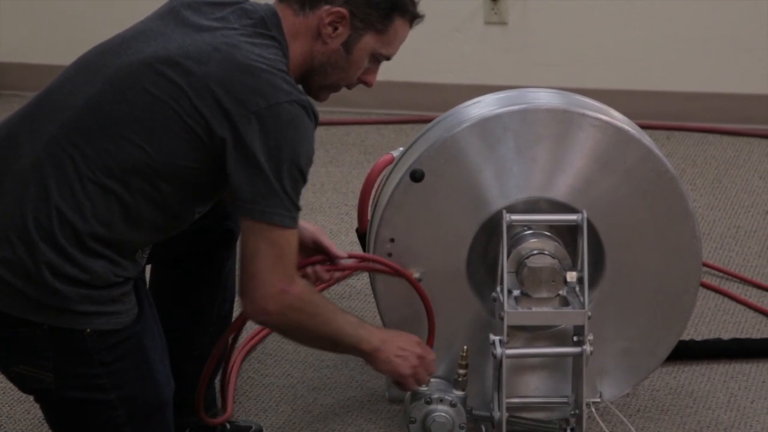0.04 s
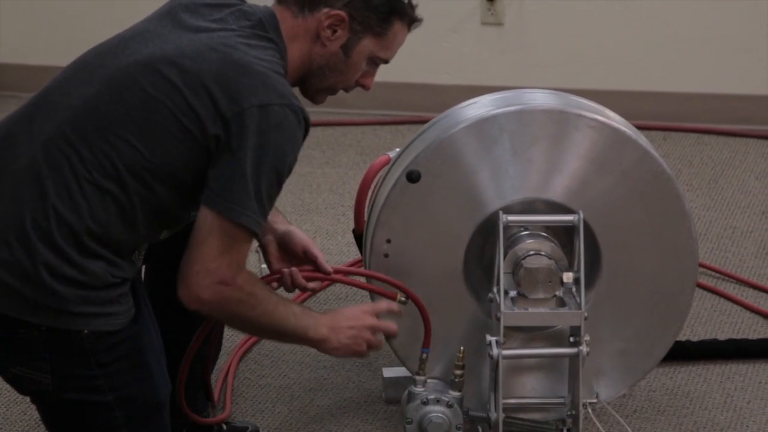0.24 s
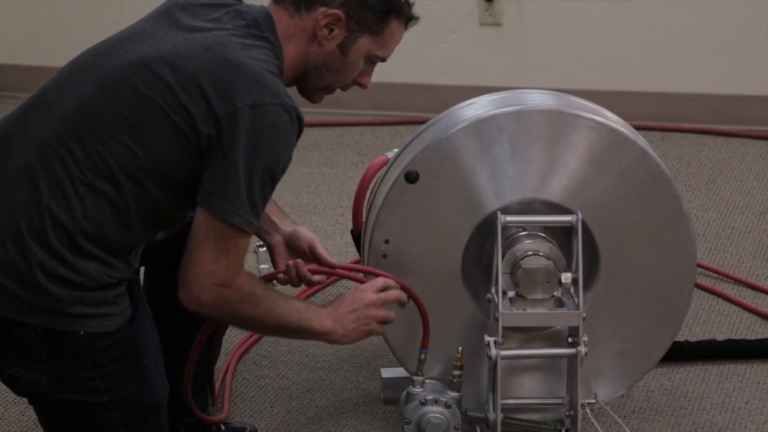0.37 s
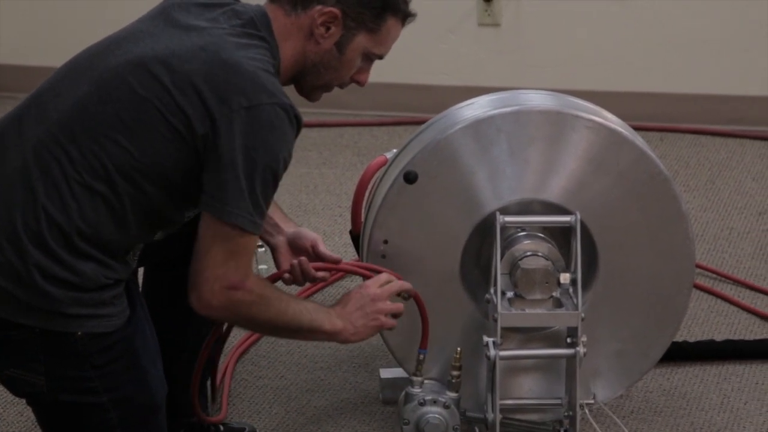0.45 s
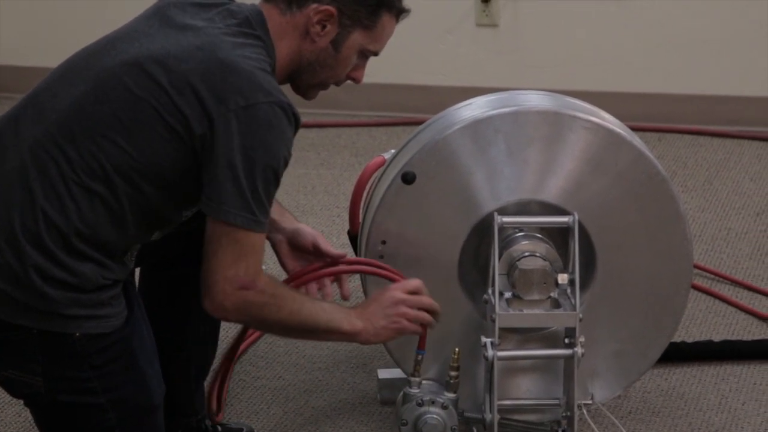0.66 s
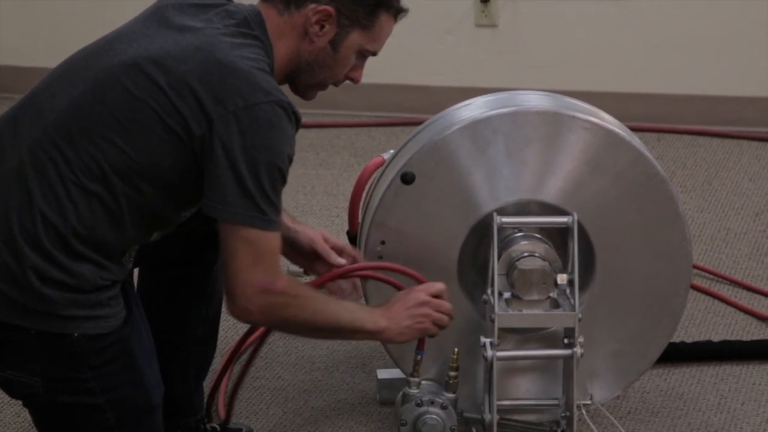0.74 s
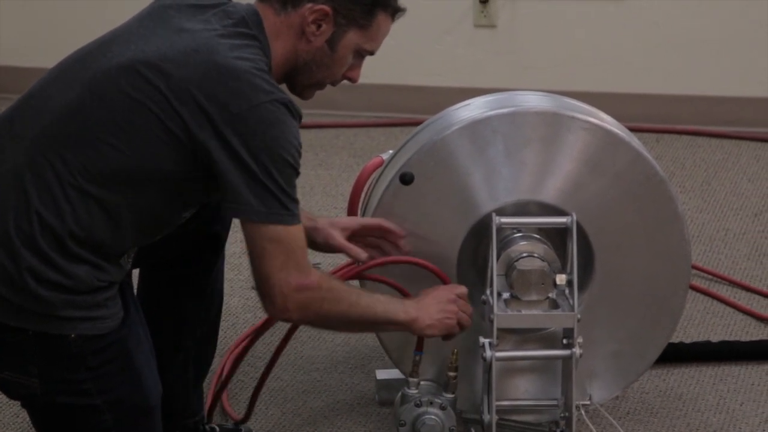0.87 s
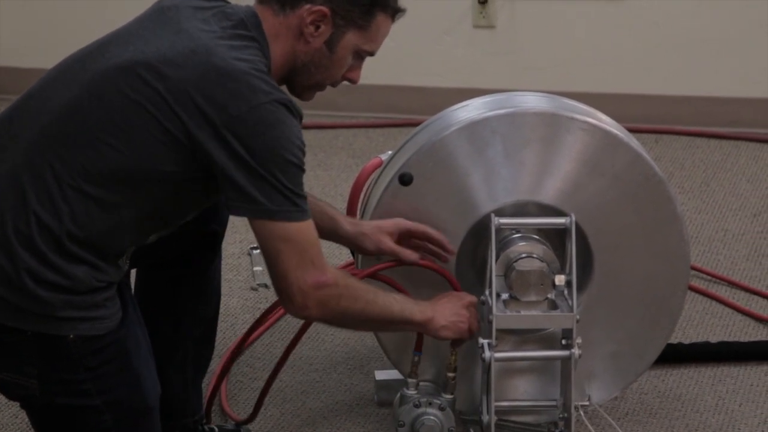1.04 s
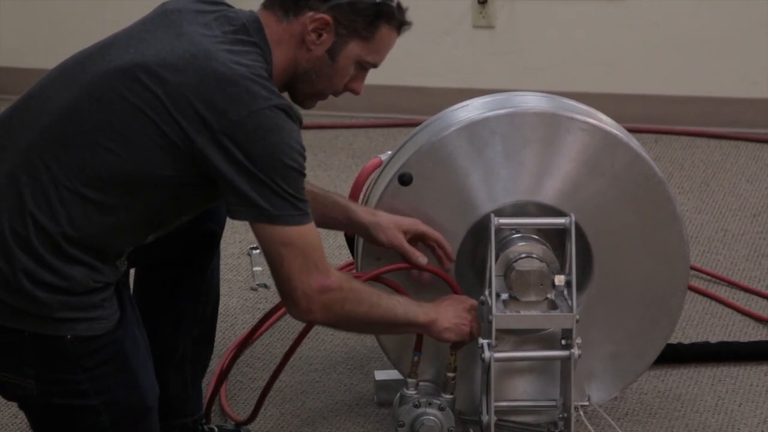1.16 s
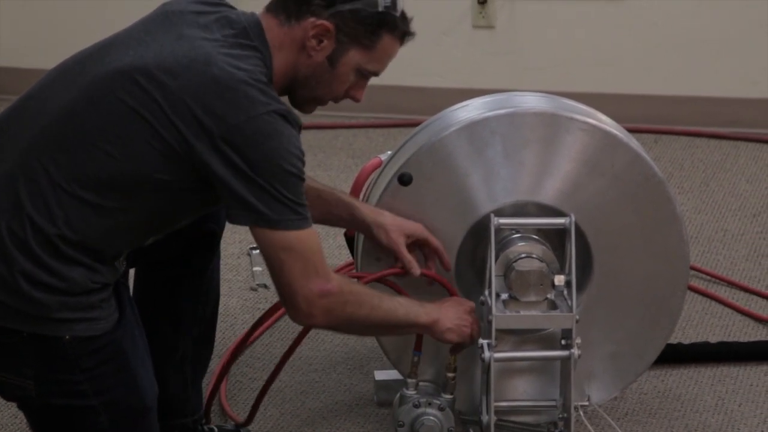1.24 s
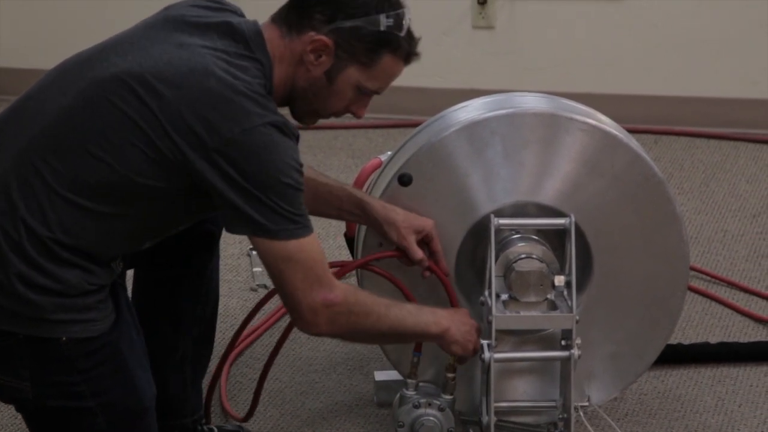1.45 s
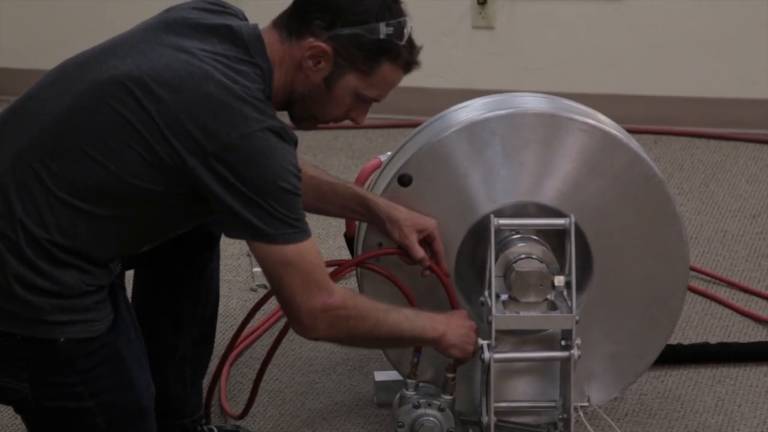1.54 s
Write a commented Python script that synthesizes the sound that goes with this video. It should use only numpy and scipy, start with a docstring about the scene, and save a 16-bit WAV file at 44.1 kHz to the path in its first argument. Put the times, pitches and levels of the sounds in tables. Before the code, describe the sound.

A metal quick-connect air fitting pops loose with a sharp hollow snap and faint hiss, then dry ticks, rubber hose sliding, and a second fitting clinking into its socket, close up in a quiet carpeted room.

```python
"""Ventilation rumbles (shaped noise) while a hose slides through the hand (noise on a level curve).
A quick-connect coupler on a pneumatic motor pops off: noise bursts, a ringing housing, bleeding air.
The hose and loose fittings tick; a second fitting rubs, knocks and clinks at its socket (decaying modes).
A metal drum hums, the hose bumps the floor and a seal squeaks at the end, in a carpeted workshop."""
import sys
import numpy as np
from scipy import signal
from scipy.fft import rfft, irfft
from scipy.io import wavfile
from scipy.ndimage import uniform_filter1d

SR = 44100
rng = np.random.default_rng(int(sys.argv[2]) if len(sys.argv) > 2 else 0)


def dump_mix(stems):
    """Bounce the given channels to the path in sys.argv[1] as a 16-bit WAV at rate SR."""
    frames = np.atleast_2d(stems).T  # one column per channel
    limited = np.clip(frames, -1, 1)  # hard clip at full scale
    pcm = np.round(limited * 32767).astype(np.int16)
    wavfile.write(sys.argv[1], SR, pcm)


N = 70560
T = np.arange(N) / SR
HZ = np.maximum(np.arange(N + 1) * SR / (2 * N), 1)

# Noise spectra give shape only: each noise is scaled to rms 1 before its level is applied.
# ventilation and hiss: [f/Hz, density/dB per Hz]
AIR_SPECTRUM = [(15, -31), (25, -9.5), (48, -35.5), (68, -8), (92, -3), (120, -5.5), (217, -16), (242, -18),
                (277, -19.5), (531, -28.5), (575, -28), (863, -33.5), (962, -33), (2990, -51),
                (3720, -46.5), (6740, -49.5), (16000, -47.5)]
AIR_DB = -44
# hiss of opposite sign left and right: [f/Hz, density/dB per Hz]
HISS_SPECTRUM = [(20, -29), (250, -2), (700, 3), (2000, 3), (15000, -9)]
HISS_DB = -69.5

# hose sliding through the hand: [t/s, level/dB], [f/Hz, density/dB per Hz]
SLIDE_LEVEL = [(0, -59), (.6, -66), (.78, -62.5), (.9, -53), (1.0, -52.5), (1.1, -54.5), (1.22, -55.5),
               (1.4, -59), (1.6, -60.5)]
SLIDE_SPECTRUM = [(500, 5.5), (1500, -3.5), (3200, -3.5), (5000, -2), (10000, -4.5), (13000, -10),
                  (16000, -39)]
# hose brushing clothing: [t/s, level/dB], [f/Hz, density/dB per Hz]
BRUSH_LEVEL = [(0, -63.5), (.9, -73.5), (1.05, -64), (1.13, -53.5), (1.2, -60.5), (1.3, -52), (1.6, -75)]
BRUSH_SPECTRUM = [(300, -9), (570, 2), (850, 0), (1500, -7), (2150, 3), (3000, -13), (8000, -43)]

# sleeve slides back, plug pops free: [t/s, level/dB]
SNAPS = [(.0514, -44), (.0543, -14.5), (.0572, -13)]
# main hollow modes of motor housing and coupler: [f/Hz, level/dB, t60/s]
HOUSING_MODES = [(535, -5, .045), (622, 0, .055)]
# their short overtones, before OVERTONE_DB: [f/Hz, level/dB]
OVERTONES = [(950, -1), (1190, -3), (1275, -5), (1385, -1), (1475, -5), (1600, -5), (1780, -8), (1965, -5),
             (2520, -11), (2920, -3), (3340, -1), (3620, -6), (4720, -7), (5250, -5)]
OVERTONE_DB, OVERTONE_1KHZ_T60_S, OVERTONE_T60_EXPONENT = -5, .024, .25
HOUSING_HIGHPASS_HZ = 450
# burst of air at the pop: [f/Hz, density/dB per Hz]
CRACK_SPECTRUM = [(200, -38), (350, -21.5), (490, 0), (720, -2.5), (850, -3.5), (1300, 1.5), (2300, -6),
                  (3400, -4), (5200, -13.5), (6500, -23), (10000, -16), (15000, -38)]
CRACK_DB, CRACK_T60_S = -.5, .021  # level relative to each snap
# trapped air hissing out: [f/Hz, density/dB per Hz]
BLEED_SPECTRUM = [(1200, -18), (2400, -5.5), (3400, -1.5), (4300, -9.5), (7000, -27.5)]
BLEED_DB, BLEED_T60_S = -48, 1

# dry ticks of hose and loose fittings: [t/s, level/dB before TICK_GAIN_DB, tilt/dB per octave]
TICKS = [(0.067, -31, 15), (0.0769, -18, 5), (0.231, -45, -5), (0.2513, -29.5, 0), (0.2548, -34, 1),
         (.261, -45, -7), (0.2858, -34, 0), (0.4414, -46.5, 0), (0.4841, -40.5, -4.5), (.606, -45, 0),
         (0.621, -40.5, 1), (.6428, -33, 6), (0.6443, -32.5, 2), (0.6473, -35, -2), (0.649, -23, -0.5),
         (0.6498, -25.5, 4.5), (.6524, -48, 11), (0.6639, -31.5, -2.5), (.6728, -26, 0), (0.748, -36, -0.5),
         (1.2574, -30, -4), (1.533, -34, 5.5)]
# filter gain of every tick: [f/Hz, gain/dB]
TICK_GAIN = [(400, -2), (1200, -5), (2200, -1), (3800, -3), (5300, 2), (9500, 0), (12500, -7.5),
             (15500, -17)]
TICK_GAIN_DB, TICK_HIGHPASS_HZ = 8, 700
RATTLE_DB, RATTLE_T60_S = -15, .016  # level relative to the spike
TILT_PIVOT_HZ, TILT_FLOOR_HZ = 8000, 2000

# plug rubbing in the socket: [t/s, level/dB]
RUB_LEVEL = [(.9, -90), (1.05, -65), (1.14, -58), (1.22, -56), (1.27, -44.5), (1.34, -46.5), (1.42, -52),
             (1.47, -62), (1.6, -60)]
RUB_SLEEVE_DB, RUBS_PER_S = -15, 3300  # sleeve relative to body; mean slip rate
# body behind the socket: [f/Hz, level/dB, t60/s]
BODY_MODES = [(1030, -14, .04), (1123, -3, .08), (1262, -3, .06), (1340, -6, .05), (1416, -1, .07),
              (1510, -4, .05), (1604, -9, .09), (1775, -7, .07), (1850, -14, .09)]
# steel sleeve: [f/Hz, level/dB, t60/s]
SLEEVE_MODES = [(4130, -15, .03), (4365, -4, .06), (4410, -3, .05), (4640, -9, .07), (4719, -2, .08),
                (4935, -3, .05), (5148, -3, .06), (7860, -14, .06), (8050, -11, .1), (8680, -19, .06)]
# hollow knocks of plug on socket: [t/s, f/Hz, level/dB]
KNOCKS = [(1.131, 590, -41), (1.1868, 1436, -25.5), (1.532, 1280, -36), (1.5356, 1230, -33.5)]
KNOCK_RISE_S = .0012
# second fitting meets its socket: [t/s, body level/dB, sleeve level/dB, grinding level/dB]
CLINKS = [(1.1808, -55, -59, -33.5), (1.1841, -61, -42, -36.5), (1.2573, -52, -45, -69),
          (1.270, -55, -44, -56), (1.280, -40.5, -42.5, -39.5), (1.2932, -47, -44, -34),
          (1.2984, -26.5, -27, -22), (1.3015, -25, -28, -30), (1.3047, -44, -34, -36),
          (1.5344, -41.5, -54.5, -46)]
# grinding: [f/Hz, density/dB per Hz]
GRIND_SPECTRUM = [(300, -26), (700, -3), (1300, 9.5), (2400, 0), (3400, -4.5), (4700, 9.5), (6200, -3),
                  (8200, 1.5), (12500, -8), (15500, -28)]
GRIND_T60_S = .029

# blows on the metal drum: [t/s, level/dB]
DRUM_BLOWS = [(1.1875, -52.5), (1.2995, -38), (1.41, -57), (1.5365, -45)]
DRUM_HZ, DRUM_T60_S = 923, .4
# ping of a locking ball: [f/Hz, level/dB, t60/s]
LATCH_MODES = [(7900, -34, 0.018), (11400, -38.5, 0.0085), (12400, -38, 0.0099), (13000, -38.5, 0.011)]
LATCH_S = 1.2574
BUMP_S, BUMP_HZ, BUMP_DB, BUMP_RISE_S, BUMP_T60_S = 1.425, 88, -27.5, .008, .15
# seal squeak: [t/s, f/Hz, level/dB]
SQUEAK = [(1.566, 3180, -85.5), (1.573, 2980, -45), (1.579, 3050, -58), (1.584, 2430, -48),
          (1.591, 2370, -73)]
SQUEAK_ROUGH = .048  # rms pitch waver, fraction of frequency

# diffuse reverberation: [f/Hz, level/dB, t60/s]
ROOM = [(290, -17.5, .4), (496, -8, 0.65), (620, -12, 0.52), (740, -8.5, 0.53), (1040, -22.5, 0.33),
        (1680, -12.5, 0.61), (2730, -18, 0.35), (3440, -12.5, 0.33), (5100, -16.5, 0.27),
        (8700, -18.5, 0.39), (15000, -39, 0.2)]
EARLY_DB, EARLY_S, EARLY_T60_S, TAIL_S = -11, .003, .12, .01
CUTOFF_HZ = 15900


def from_db(db):
    """Decibels to gain."""
    return 10 ** (np.asarray(db) / 20)


def rms_one(x):
    """Scale to unit rms."""
    return x / np.sqrt(np.mean(x ** 2) + 1e-20)


def in_time(rows):
    """Interpolate a table's columns linearly in time."""
    s, *columns = np.transpose(rows)
    return [np.interp(T, s, c) for c in columns]


def level_gain(rows):
    """Gain curve of a [t/s, level/dB] table."""
    return from_db(in_time(rows)[0])


def at_hz(rows, hz, axis=1):
    """Read a table's column on a log-frequency axis."""
    rows = np.array(rows)
    return np.interp(np.log(hz), np.log(rows[:, 0]), rows[:, axis])


def colour(x, db):
    """Causal minimum-phase filter with the given gain/dB at each frequency of HZ."""
    cepstrum = irfft(np.log(from_db(db)))
    # fold the cepstrum onto positive time
    cepstrum[1:N] *= 2
    cepstrum[N + 1:] = 0
    response = np.exp(rfft(cepstrum))
    return irfft(rfft(x, 2 * N) * response)[:N]


def highpass(x, hz):
    """Third-order Butterworth high-pass."""
    return signal.sosfilt(signal.butter(3, hz, "high", fs=SR, output="sos"), x)


def noise(spectrum):
    """Steady noise of a given spectrum, rms 1."""
    white = rfft(rng.standard_normal(2 * N))
    return rms_one(irfft(white * from_db(at_hz(spectrum, HZ)))[:N])


def fade(t60, start=0):
    """Sudden start, exponential decay."""
    return (T >= start) * from_db(-60 * np.maximum(T - start, 0) / t60)


def clicks(times, db):
    """One single-sample contact at each time."""
    out = np.zeros(N)
    index = np.clip((np.asarray(times) * SR).astype(int), 0, N - 1)
    np.add.at(out, index, from_db(db))
    return out


def convolve(x, response):
    """Pass a sound through an impulse response."""
    return signal.fftconvolve(x, response)[:N]


def ring(force, modes):
    """Drive decaying modes of alternating sign."""
    response = np.zeros(N)
    for k, (hz, db, t60) in enumerate(modes):
        response += (-1) ** k * from_db(db) * fade(t60) * np.sin(2 * np.pi * hz * T)
    return convolve(force, response)


def ventilation():
    """Steady shaped noise: low rumble and faint hiss."""
    return from_db(AIR_DB) * noise(AIR_SPECTRUM)


def side_hiss():
    """Steady faint noise for the stereo difference."""
    return from_db(HISS_DB) * noise(HISS_SPECTRUM)


def hose_slide():
    """Rubber friction in the hand: noise on a level curve."""
    return level_gain(SLIDE_LEVEL) * noise(SLIDE_SPECTRUM)


def cloth_brush():
    """Hose on clothing: duller noise on its own level curve."""
    return level_gain(BRUSH_LEVEL) * noise(BRUSH_SPECTRUM)


def coupler():
    """Snaps burst air and ring the housing; trapped air bleeds after the last one."""
    modes = list(HOUSING_MODES)
    for hz, db in OVERTONES:
        t60 = OVERTONE_1KHZ_T60_S * (1000 / hz) ** OVERTONE_T60_EXPONENT
        modes.append((hz, db + OVERTONE_DB, t60))
    housing = highpass(ring(clicks(*np.transpose(SNAPS)), modes), HOUSING_HIGHPASS_HZ)
    crack = sum(from_db(db + CRACK_DB) * fade(CRACK_T60_S, s) for s, db in SNAPS)
    bleed = from_db(BLEED_DB) * fade(BLEED_T60_S, SNAPS[-1][0])
    return housing + crack * noise(CRACK_SPECTRUM) + bleed * noise(BLEED_SPECTRUM)


def ticks():
    """Sharp spike plus very short noise rattle; parts too small to give bass."""
    out = np.zeros(N)
    octaves = np.log2(np.maximum(HZ, TILT_FLOOR_HZ) / TILT_PIVOT_HZ)
    for s, db, tilt_db in TICKS:
        rattle = from_db(RATTLE_DB) * fade(RATTLE_T60_S, s) * rng.standard_normal(N)
        contact = clicks([s], [0]) + rattle
        out += colour(contact, db + TICK_GAIN_DB + at_hz(TICK_GAIN, HZ) + tilt_db * octaves)
    return highpass(out, TICK_HIGHPASS_HZ)


def rubbing():
    """Random tiny slips of the plug keep the body and sleeve modes sounding."""
    slips = (rng.random(N) < RUBS_PER_S / SR) * rng.standard_normal(N)
    body = rms_one(ring(slips, BODY_MODES))
    sleeve = from_db(RUB_SLEEVE_DB) * rms_one(ring(slips, SLEEVE_MODES))
    return level_gain(RUB_LEVEL) * (body + sleeve)


def socket_knocks():
    """Hollow knocks: sines that swell and die within a few cycles."""
    out = np.zeros(N)
    for s, hz, db in KNOCKS:
        age = np.maximum(T - s, 0)
        swell = age / KNOCK_RISE_S * np.exp(1 - age / KNOCK_RISE_S)  # peak 1
        out += from_db(db) * swell * np.sin(2 * np.pi * hz * age)
    return out


def fitting():
    """Each contact grinds briefly and rings the body and sleeve."""
    s, body_db, sleeve_db, grind_db = np.transpose(CLINKS)
    body = ring(clicks(s, body_db), BODY_MODES)
    sleeve = ring(clicks(s, sleeve_db), SLEEVE_MODES)
    grind = sum(from_db(db) * fade(GRIND_T60_S, start) for start, db in zip(s, grind_db))
    return body + sleeve + grind * noise(GRIND_SPECTRUM)


def drum():
    """One long, clear mode of the metal drum, struck by each blow."""
    return ring(clicks(*np.transpose(DRUM_BLOWS)), [(DRUM_HZ, 0, DRUM_T60_S)])


def locking_ball():
    """One contact rings short, high modes."""
    return ring(clicks([LATCH_S], [0]), LATCH_MODES)


def floor_bump():
    """Soft hose bump on the floor: low sine, rounded onset, exponential decay."""
    age = np.maximum(T - BUMP_S, 0)
    envelope = (1 - np.exp(-age / BUMP_RISE_S)) * fade(BUMP_T60_S, BUMP_S)
    return from_db(BUMP_DB) * envelope * np.sin(2 * np.pi * BUMP_HZ * age)


def seal():
    """Short falling squeak: a sine roughened by random pitch waver."""
    hz, db = in_time(SQUEAK)
    waver = rms_one(uniform_filter1d(rng.standard_normal(N), size=30))
    phase = 2 * np.pi * np.cumsum(hz * (1 + SQUEAK_ROUGH * waver)) / SR
    return (T > SQUEAK[0][0]) * from_db(db) * np.sin(phase)


def room(x):
    """Near reflections off the machine, then a diffuse tail decaying band by band."""
    edges = np.geomspace(200, 17000, 23)
    white = rng.standard_normal((3, N))
    early = white[2] * fade(EARLY_T60_S, EARLY_S)
    response = from_db(EARLY_DB) * early / np.linalg.norm(early)
    for k, (low, high) in enumerate(zip(edges, edges[1:])):
        hz = np.sqrt(low * high)
        envelope = fade(at_hz(ROOM, hz, axis=2), TAIL_S)
        sos = signal.butter(2, [low, high], "band", fs=SR, output="sos")
        band = signal.sosfilt(sos, white[k % 2])  # neighbouring bands use different noise
        response += from_db(at_hz(ROOM, hz)) * band * envelope / np.linalg.norm(envelope)
    return convolve(x, response)


def scene():
    """All sources central; only the side hiss has width; drum and ventilation bypass the room."""
    work = coupler() + fitting() + socket_knocks() + locking_ball() + rubbing() + ticks()
    work += hose_slide() + cloth_brush() + floor_bump() + seal()
    mid = work + room(work) + drum() + ventilation()
    side = side_hiss()
    return np.array([mid + side, mid - side])


def record(dry):
    """Steep elliptic low-pass."""
    return signal.sosfilt(signal.ellip(10, .2, 80, CUTOFF_HZ, fs=SR, output="sos"), dry)


dry = scene()
out = record(dry)
dump_mix(out)
```